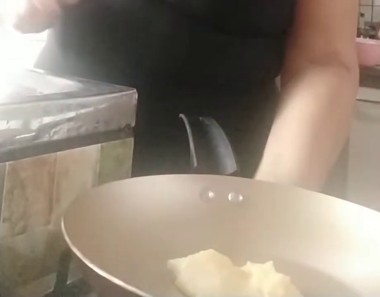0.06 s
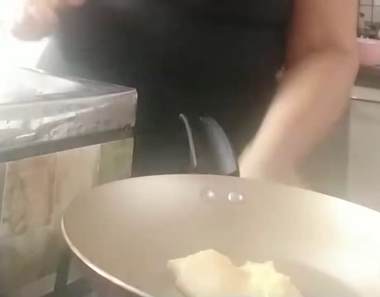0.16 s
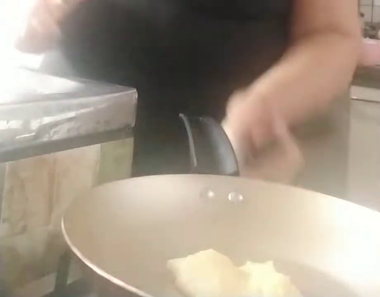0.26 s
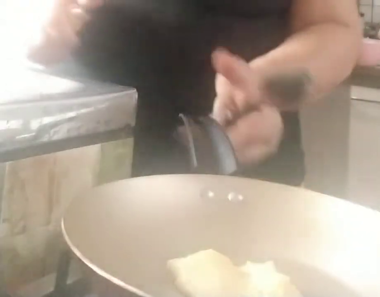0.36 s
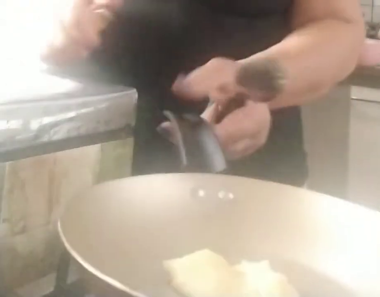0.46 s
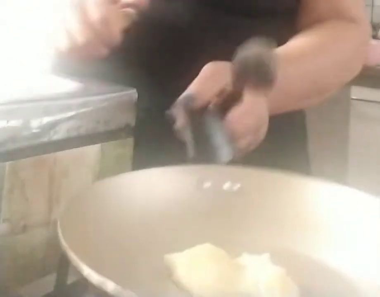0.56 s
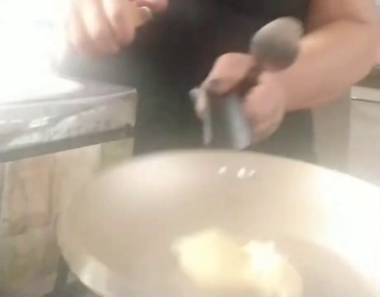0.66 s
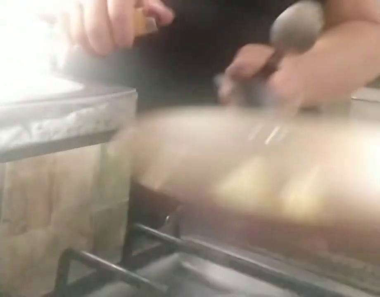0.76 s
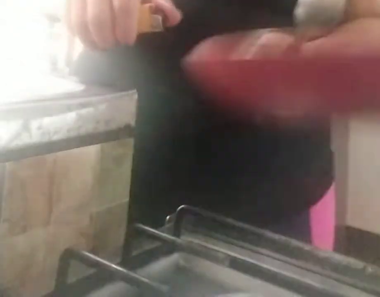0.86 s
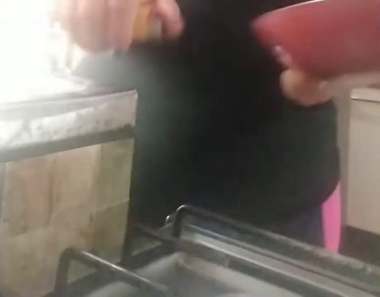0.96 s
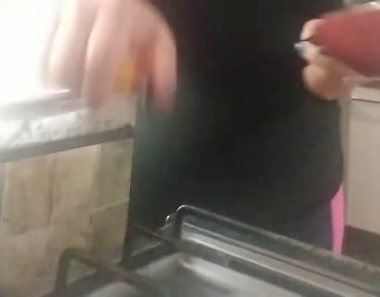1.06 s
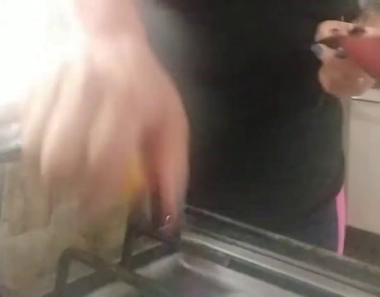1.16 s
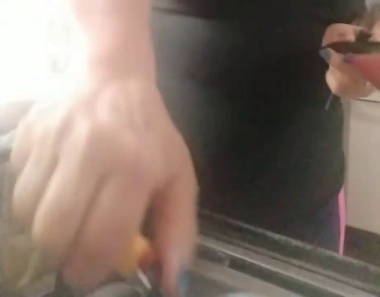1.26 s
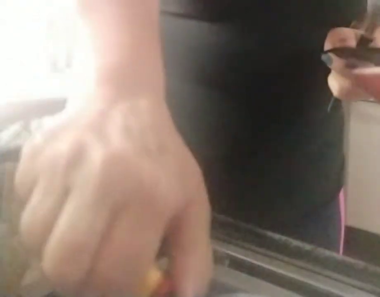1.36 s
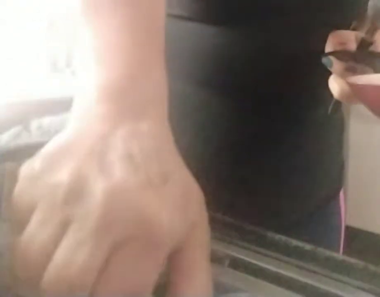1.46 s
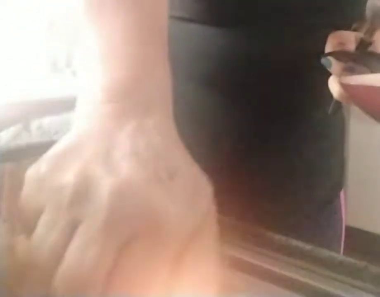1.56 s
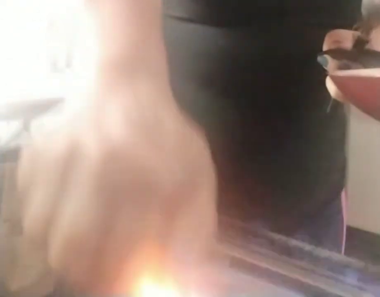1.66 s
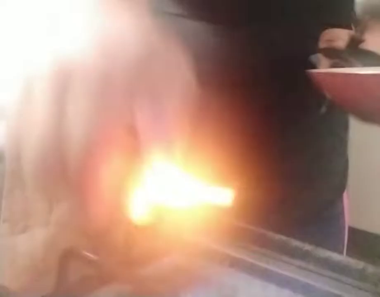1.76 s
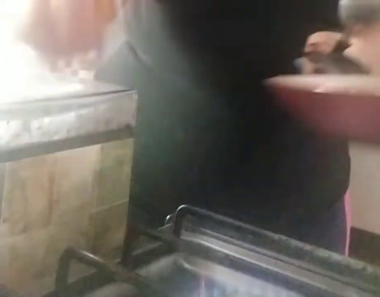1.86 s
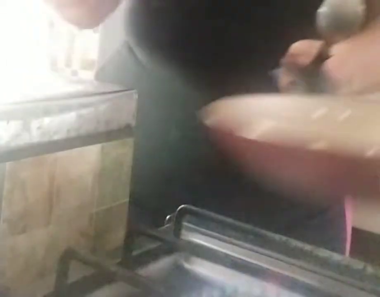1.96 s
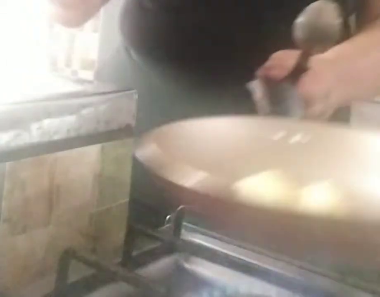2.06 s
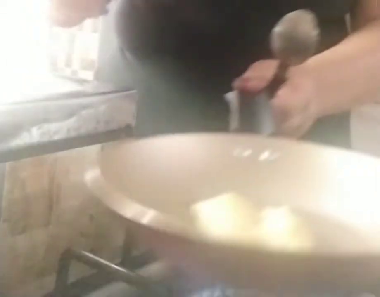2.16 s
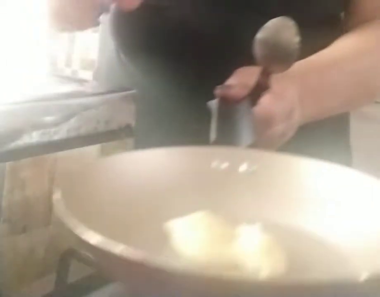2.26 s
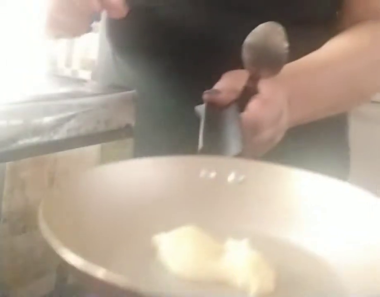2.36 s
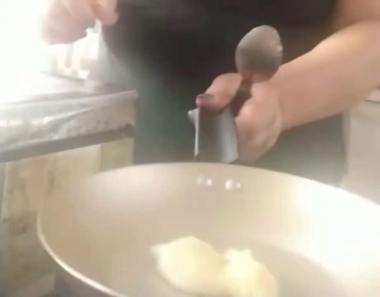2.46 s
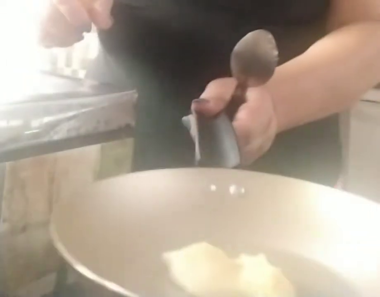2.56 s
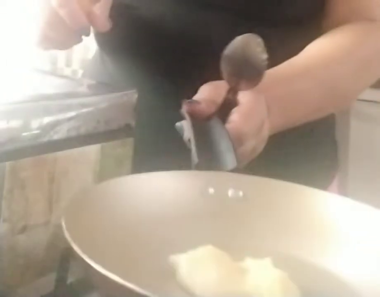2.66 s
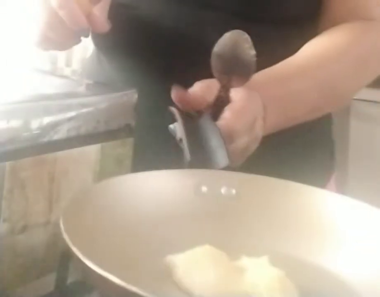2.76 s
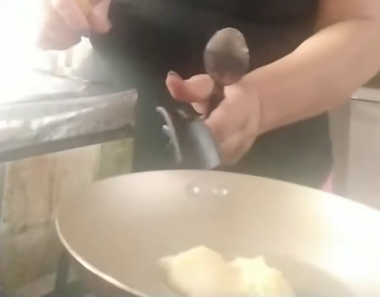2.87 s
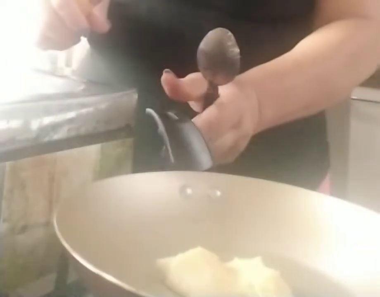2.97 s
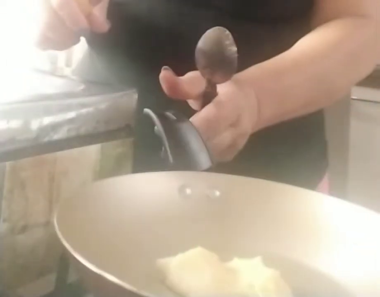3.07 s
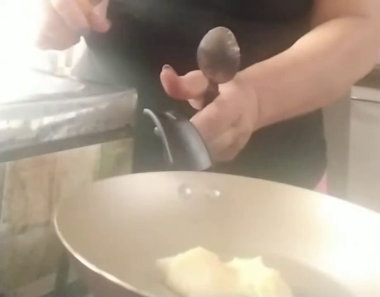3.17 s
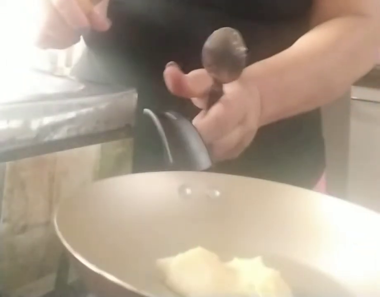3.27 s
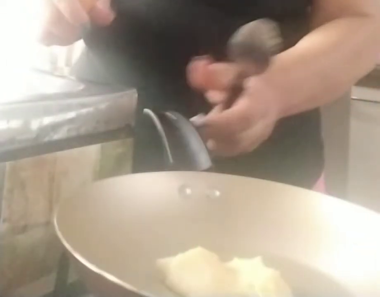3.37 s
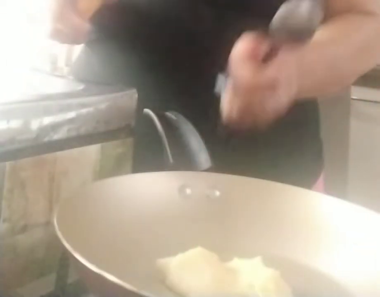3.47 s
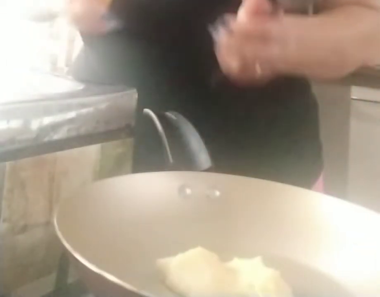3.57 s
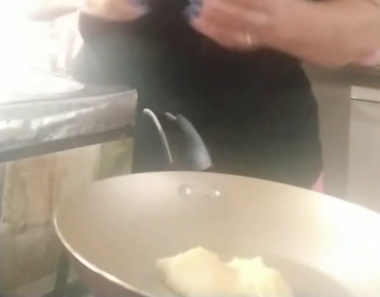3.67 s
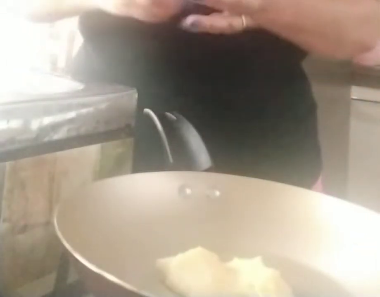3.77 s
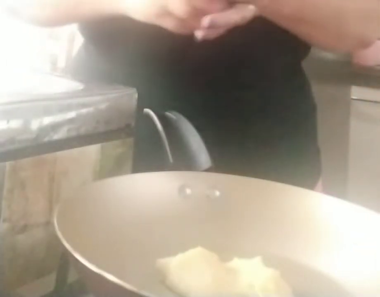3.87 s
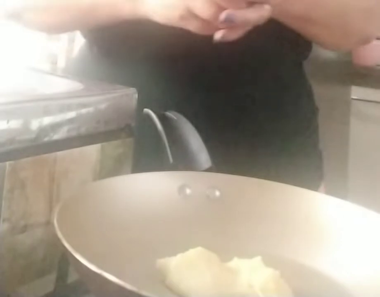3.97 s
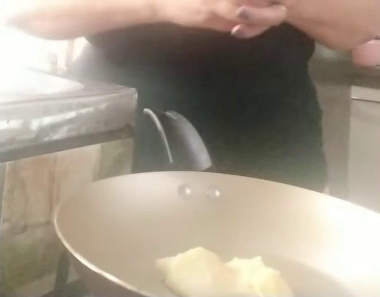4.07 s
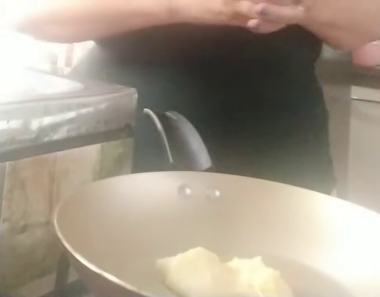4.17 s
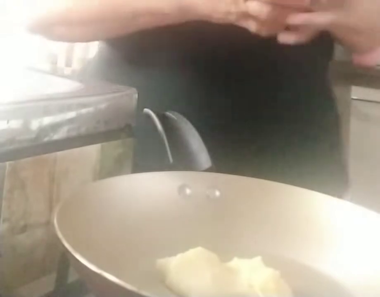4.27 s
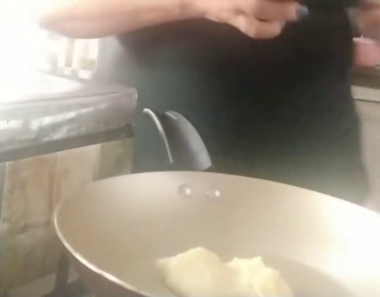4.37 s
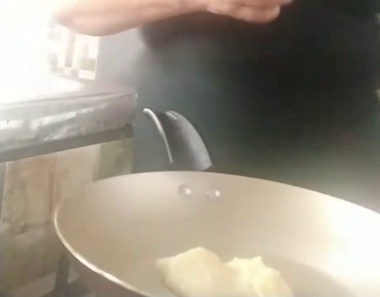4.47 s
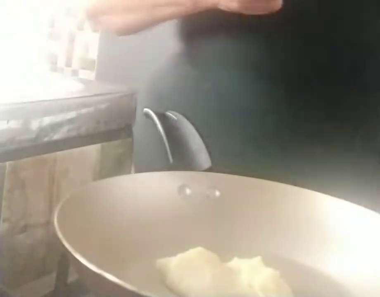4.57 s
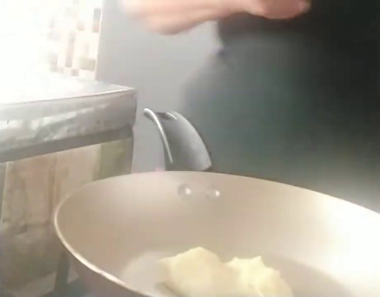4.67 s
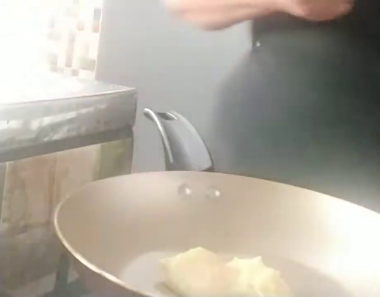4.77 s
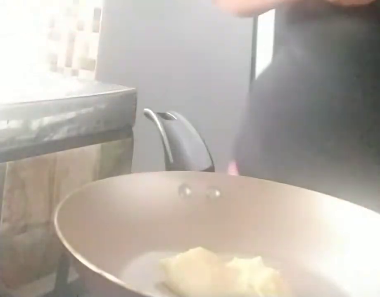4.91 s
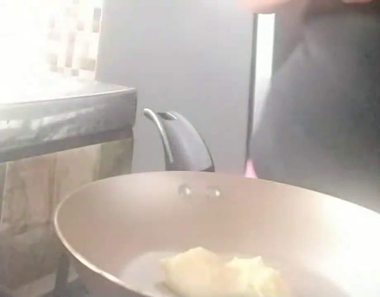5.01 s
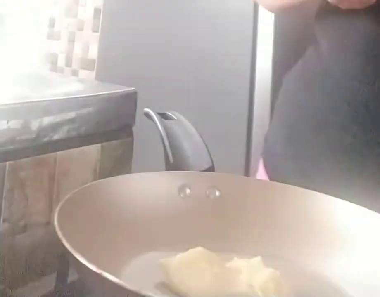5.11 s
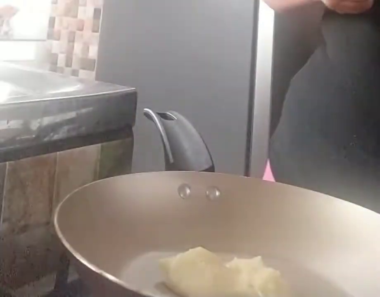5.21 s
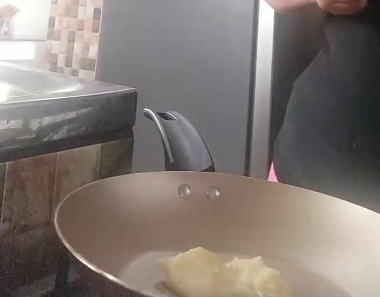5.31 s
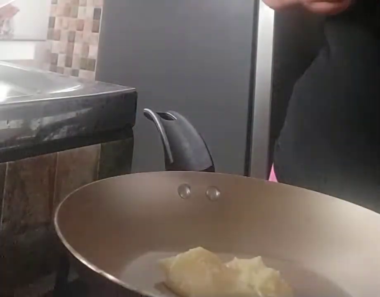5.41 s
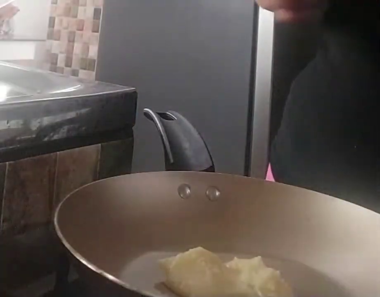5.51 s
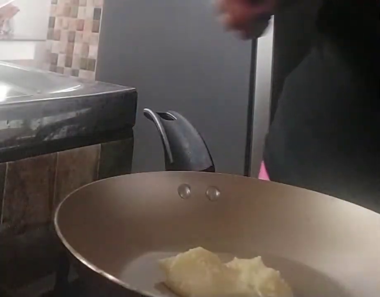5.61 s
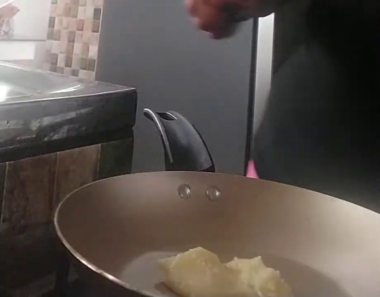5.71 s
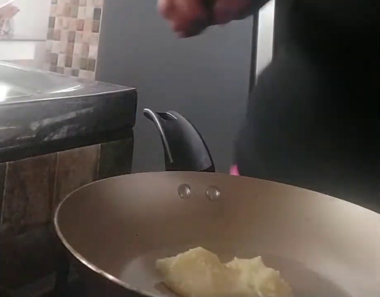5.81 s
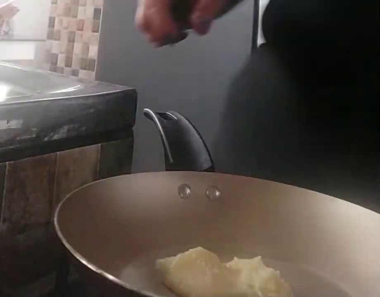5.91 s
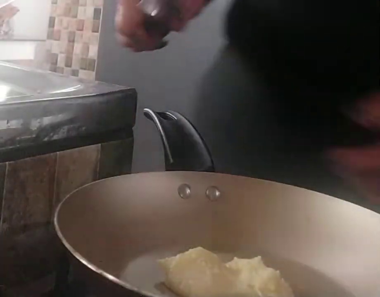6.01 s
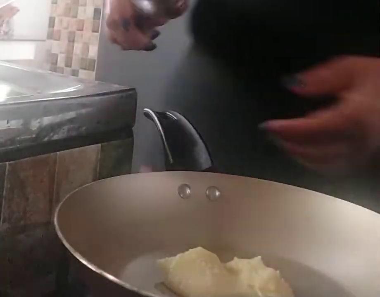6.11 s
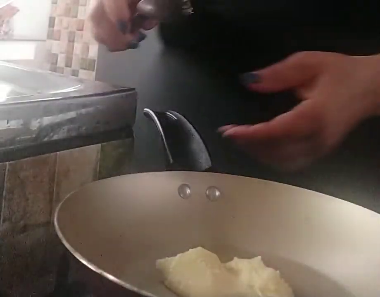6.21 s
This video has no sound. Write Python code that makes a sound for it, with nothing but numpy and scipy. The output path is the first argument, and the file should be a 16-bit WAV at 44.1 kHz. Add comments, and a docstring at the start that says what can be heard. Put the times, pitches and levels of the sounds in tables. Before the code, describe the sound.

Close stove noises in a tiled kitchen: metal clanks, a sharp lighter snap, whooshing gas, pan set down, bright clicks, a distant rooster.

```python
"""Clanks and scrapes of a frying pan lifted off a gas stove, set back and slid into place, by noise and ringing modes.
In between, the iron grate is knocked, a lighter snaps, and gas hisses and catches with a puff: noise and a rising sine.
Spoon and hard plastic things click in a small tiled kitchen of random echoes; soft soles brush the floor.
Fingers tap and hands rub the hollow microphone case; a rooster, two sines, crows far away over steady coloured hiss."""
import sys
import numpy as np
from scipy import signal
from scipy.fft import rfft, irfft
from scipy.io import wavfile
from scipy.ndimage import uniform_filter1d

SR = 44100
rng = np.random.default_rng(int(sys.argv[2]) if len(sys.argv) > 2 else 0)


def unload_audio(sound):
    """Save the sound as a 16-bit wav file, at the path given as the first command line argument."""
    columns = np.transpose(np.atleast_2d(sound))
    # keep every value between -1 and 1, then stretch to whole-number steps
    steps = np.round(np.clip(columns, -1, 1) * 32767)
    wavfile.write(sys.argv[1], SR, steps.astype(np.int16))


N = 275625
TIME = np.arange(N) / SR
FREQS = np.maximum(np.arange(N // 2 + 1) * SR / N, 1)

# Pan against grate. Each row: start in seconds, clank in dB, thud in dB, tick in dB, ping in Hz, ping in dB.
PAN_KNOCKS = [(0.139, -68, -47, -36, 1264, -40), (0.4364, -32, -51, -39.5, 3900, -41.5),
              (0.568, -49, -41, -48, 2830, -48), (0.623, -47, -39, -60, 946, -40),
              (2.4605, -28, -40, -20, 4340, -41), (2.476, -40, -35, -50, 1760, -47),
              (2.5141, -39.5, -43, -30, 2890, -32), (2.655, -24.5, -29, -25.5, 2430, -33),
              (2.667, -29, -29, -25.5, 1120, -36), (2.686, -28, -31, -50, 1880, -46),
              (2.693, -44, -31, -50, 308, -26), (2.6992, -38, -32, -59, 320, -30),
              (2.711, -48, -36, -59, 316, -23), (2.969, -38.5, -41.5, -64, 1370, -41),
              (2.992, -38, -38, -64, 1400, -42), (3.008, -42, -37, -62, 1010, -40)]
# Long rings of the pan. Each row: frequency in Hz, level re blow in dB, t60 in seconds.
PAN_MODES = [(1000, -2, 0.23), (1870, -22, 0.18), (2090, -9, 0.36), (2730, -25, 0.2), (4360, -18, 0.4),
             (5150, -6.5, 0.21), (8700, -28, .25)]
# Clusters of short pan modes. Each row: centre in Hz, width in Hz, gain in dB.
PAN_PEAKS = [(1050, 600, 5), (1920, 300, 6), (2830, 270, 7), (3560, 150, 7), (4050, 510, 18),
             (5450, 230, -7), (8690, 210, 16.5), (10000, 200, 3), (10760, 300, 9)]
# Stove thud spectrum. Each row: frequency in Hz, relative density in dB per Hz.
THUD_COLOUR = [(40, -17), (110, -10), (180, -6), (320, -3.5), (430, -10.5), (600, -6.5), (900, -42)]
# Clank spectrum of pan and grate. Each row: frequency in Hz, relative density in dB per Hz.
CLANK_COLOUR = [(350, -28), (600, 0), (1000, 3.5), (1500, 1), (2700, 2.5), (3500, -19.5), (4000, -18),
                (5000, -22), (8000, -35)]
# Contact tick spectrum. Each row: frequency in Hz, relative density in dB per Hz.
TICK_COLOUR = [(2500, -14.5), (3300, 1.5), (3800, -19), (5000, -3), (6500, -6.5), (7500, 5.5), (8300, -8.5),
               (9000, 6), (10500, -5), (12000, -16), (16000, -28)]
# Low modes of the pan, heard within the thud. Each row: centre in Hz, width in Hz, gain in dB.
PAN_LOW_PEAKS = [(199, 25, 16.5), (321, 32, 18), (428, 71, 21)]
# Stove, likeness of channels. Each row: frequency in Hz, correlation, limited to -1..1 in use.
STOVE_LIKENESS = [(60, 1.1), (300, 0.64), (600, 0.65), (1000, -0.06), (2000, 0), (9000, 0.5)]
# Stove, off to one side. Each row: frequency in Hz, left-right difference in dB.
STOVE_BALANCE = [(200, -1.5), (500, 1), (1000, 3), (2000, -1.5), (5000, 0), (9000, 0.5)]

# Pan pushed over the grate. Each row: start in seconds, end in seconds, level in dB, swell over the push in dB.
PAN_SLIDES = [(0.136, 0.141, -36, -2), (0.446, 0.505, -46, -2), (0.526, 0.587, -46.5, 3),
              (0.59, 0.65, -43.5, -3.5), (2.462, 2.57, -47, 2.5), (2.65, 2.705, -39, -0.5),
              (2.717, 2.943, -54.5, 3), (2.97, 3.012, -41.5, -6.5)]
# Scrape spectrum of the pushes. Each row: frequency in Hz, relative density in dB per Hz.
SLIDE_COLOUR = [(40, -4), (170, 10), (330, 0.5), (700, 1.5), (1050, -5.5), (1500, -6), (2700, -11),
                (4500, -23), (6500, -16), (8800, -9.5), (12000, -20), (16000, -52)]
# Pan resonances rung by the dragging rim. Each row: centre in Hz, width in Hz, gain in dB.
DRAG_PEAKS = [(994, 38, 5.5), (1780, 150, -7), (2110, 70, -4), (2800, 240, -5), (4100, 270, -11.5),
              (5640, 430, -18), (8830, 290, -6)]

# Grate knocked by the lighter. Each row: start in seconds, level in dB.
GRATE_HITS = [(1.2832, -23), (1.285, -23.5), (1.2985, -39)]
# Long rings of the grate. Each row: frequency in Hz, level re blow in dB, t60 in seconds.
GRATE_MODES = [(173, -11, 0.31), (428, -23, 0.5), (760, -14, 0.11), (1020, -31.5, 0.86), (1285, -19, 0.62),
               (1405, -18, 0.4), (1714, -19, 0.24), (1940, -17, 0.12), (2159, -19.5, 0.47),
               (2440, -26, 0.24), (2520, -15, 0.22), (5190, -23.5, 0.36), (5260, -29, 0.2)]
# Quickly damped grate modes. Each row: centre in Hz, width in Hz, gain in dB.
GRATE_PEAKS = [(1934, 87, 21), (3260, 250, 11), (5400, 180, 16.5), (10660, 500, 20.5)]

# Flame catches, then leaps round the burner. Each row: start in seconds, roar in dB, whoop in dB.
PUFFS = [(1.585, -34, -27), (1.637, -34, -38)]
# Gas hiss spectrum. Each row: frequency in Hz, relative density in dB per Hz.
GAS_COLOUR = [(500, -8), (900, -5), (2000, -11), (4500, -17), (5500, -1), (6500, -27), (8000, -5),
              (9300, 2), (12000, -16), (16000, -34)]
# Flame roar spectrum. Each row: frequency in Hz, relative density in dB per Hz.
FLARE_COLOUR = [(25, -11), (70, 1.5), (160, -3), (300, -1.5), (600, -8.5), (1100, -8), (2000, -16.5),
                (5000, -29), (9000, -14.5), (14000, -39)]

# Lighter snaps. Each row: start in seconds, level in dB.
SPARKS = [(1.53, -36.5), (1.5791, -10), (1.5803, -2)]
# Snap spectrum. Each row: frequency in Hz, relative density in dB per Hz.
SPARK_COLOUR = [(200, -19), (900, -21), (2000, -21.5), (3600, -12.5), (4900, -15), (6000, -13.5),
                (7400, -11), (9200, -8.5), (11000, -12.5), (13000, -16), (16000, -23)]
# Small metal hood of the lighter. Each row: centre in Hz, width in Hz, gain in dB.
SPARK_PEAKS = [(3030, 320, -2), (4260, 300, 8), (5500, 420, 18.5), (6520, 260, 6), (7260, 340, 12),
               (8350, 350, 7.5), (9300, 440, 11), (10590, 330, 15)]

# Hard things clicking in the kitchen. Each row: start in seconds, crack in dB, dull knock in dB.
CLICKS = [(1.887, -38, -44), (1.904, -34.5, -45), (2.1029, -38, -39.5), (2.119, -55, -47.5),
          (3.3379, -31, -38.5), (3.3513, -29.5, -42), (3.372, -33, -41), (3.4006, -42, -60),
          (4.7827, -28.5, -41.5), (5.2257, -15.5, -40), (5.233, -9.5, -25.5), (5.2405, -16.5, -27.5)]
# Bright crack spectrum. Each row: frequency in Hz, relative density in dB per Hz.
CLICK_BRIGHT = [(1500, -29), (2800, -14), (3500, -9), (4400, -13), (5400, -8.5), (7000, -4), (8200, -1.5),
                (9300, 4), (10800, -1), (12000, -7), (16000, -30)]
# Dull knock spectrum. Each row: frequency in Hz, relative density in dB per Hz.
CLICK_DULL = [(100, -9), (300, -2), (550, 1), (1100, 3), (1700, 6.5), (2700, 11), (4500, -10.5)]
# Resonances of the crack. Each row: centre in Hz, width in Hz, gain in dB.
CLICK_PEAKS = [(4030, 300, 6), (4820, 200, 6), (7700, 230, 9.5), (8440, 160, 11), (14000, 500, 6)]
# Rings of the small parts. Each row: frequency in Hz, level re crack in dB, t60 in seconds.
CLICK_MODES = [(3830, -16, 0.045), (7586, -32, 0.2), (7726, -32, 0.2), (8167, -27, 0.2), (8240, -26, 0.22)]

# Fingers on the case. Each row: start in seconds, level in dB.
TAPS = [(3.9694, -36.5), (5.809, -38.5), (6.1362, -42), (6.138, -31)]
# Case ringing like a short closed pipe. Each row: frequency in Hz, level re tap in dB, t60 in seconds.
CASE_MODES = [(230, -43, 0.042), (549, 6.5, 0.02), (1460, 1.5, 0.005), (2580, -7, 0.01), (3340, -19, 0.013),
              (9600, -6.5, 0.014)]
# Hands and cloth brushing past. Each row: start in seconds, end in seconds, level in dB.
RUBS = [(1.895, 1.963, -48), (2.056, 2.185, -51.5), (4.797, 4.82, -40.5), (4.998, 5.008, -52),
        (6.129, 6.132, -43.5)]
# Rub spectrum. Each row: frequency in Hz, relative density in dB per Hz.
RUB_COLOUR = [(200, -3), (540, 10.5), (1000, -3), (1550, -8), (2600, -1.5), (3800, -9.5), (6500, -5.5),
              (9200, 10), (11000, -4.5), (16000, -18)]

# Feet shuffling on tiles. Each row: start in seconds, level in dB.
SHUFFLES = [(4.035, -45), (4.67, -44.5)]
# Shuffle spectrum. Each row: frequency in Hz, relative density in dB per Hz.
SHUFFLE_COLOUR = [(150, -10), (600, 0), (1200, -4), (2500, -11.5), (12000, -23)]

# Steady background spectrum. Each row: frequency in Hz, relative density in dB per Hz.
AIR_COLOUR = [(20, -1.5), (65, -6), (90, -12.5), (200, -6.5), (290, -12), (700, -12.5), (1080, -23.5),
              (2000, -22.5), (3800, -22), (6000, -23), (8000, -23), (10000, -21.5), (12000, -30),
              (15500, -38.5)]
# Broad peaks and one narrow gap in the background hiss. Each row: centre in Hz, width in Hz, gain in dB.
AIR_PEAKS_AND_GAP = [(542, 166, 14), (1514, 263, 14.5), (2543, 320, 7), (3470, 910, 5.5),
                     (3695, 183, -37.5), (8800, 590, 7), (9420, 610, 7.5)]
# Background balance. Each row: frequency in Hz, left-right difference in dB.
AIR_BALANCE = [(60, 0), (110, -3.5), (200, 0), (380, -1.5), (700, 1), (1290, -1), (2380, -2), (4400, -0.5),
               (8120, -9), (15000, 3)]
# Default likeness of channels. Each row: frequency in Hz, left-right correlation.
LIKENESS = [(30, 0), (70, 0.74), (250, 0.65), (550, 0.96), (1100, 0.24), (2500, 0.54), (5000, 0.15),
            (9000, 0.061), (16000, 0)]
# Kitchen decay. Each row: frequency in Hz, t60 in seconds.
KITCHEN_T60 = [(100, 0.68), (500, 0.2), (1400, 0.48), (3700, 0.51), (9000, 0.48), (15000, 0.24)]

PING_T60_S = 0.048
SLIDE_ATTACK_S, SLIDE_T60_S = 0.0015, 0.3
PUSH_SLIPS_PER_S, SLIP_DECAY_S, PUSH_SMOOTH = 170, 0.0059, 0.44
DRAG_START_S, DRAG_END_S, DRAG_DB, DRAG_SWELL_DB = 2.468, 2.626, -44, -0.5
DRAG_SLIPS_PER_S, SLIP_SPREAD_DB = 700, 2
GAS_ON_S, IGNITION_S, GAS_DB, GAS_SWELL_DB = 1.526, 1.585, -49.5, 11
PUFF_ATTACK_S, PUFF_HOLD_S, ROAR_T60_S, WHOOP_T60_S = 0.0063, 0.021, 0.32, 0.12
FLUTTER_HZ, FLUTTER_RISE_HZ_PER_S, FLUTTER_TOP_HZ = 55.7, 1750, 330
RUB_ATTACK_S, RUB_T60_S = 0.0021, 0.34
CROW_START_S, CROW_END_S, CROW_START_HZ, CROW_SAG_HZ_PER_S = 3.37, 3.87, 1086, 48
CROW_DB, CROW_FADE_DB = -65.5, 3
AIR_DB = -50.5
CUTOFF_HZ = 15900


def pan_knocks():
    """Contact ticks and pings, the pan clanks and rings, and the stove top answers with a slower thud."""
    start_s, clank_db, thud_db, tick_db, ping_hz, ping_db = np.transpose(PAN_KNOCKS)
    tick = noise(TICK_COLOUR, PAN_PEAKS, ripple_peak_db=5) * panned(-0.94)
    tick = tick * bursts(start_s, tick_db, t60_s=0.043, rise_s=0.00046)
    clank = noise(CLANK_COLOUR, PAN_PEAKS, ripple_peak_db=10, likeness=STOVE_LIKENESS)
    clank = clank * bursts(start_s, clank_db, t60_s=0.065, rise_s=0.001)
    thud = noise(THUD_COLOUR, PAN_LOW_PEAKS, likeness=STOVE_LIKENESS)
    thud = thud * bursts(start_s, thud_db, t60_s=0.089, rise_s=0.0029)
    ping = np.zeros(N)
    for at_s, hz, db in zip(start_s, ping_hz, ping_db):
        envelope = bursts([at_s], [db], t60_s=PING_T60_S, rise_s=0.0012)
        ping += envelope * np.sin(2 * np.pi * hz * (TIME - at_s))
    long_ring = from_db(-16.5) * ring(start_s, clank_db, PAN_MODES, low_cut_hz=730)
    return tick + clank + thud + ping + long_ring


def pan_slide():
    """The base catches and slips on the iron bars: random jolts with short decays modulate coloured noise."""
    jolts = slips(PUSH_SLIPS_PER_S) + 1e-18
    grip = rms_one(signal.lfilter([1], [1, -np.exp(-1 / (SLIP_DECAY_S * SR))], jolts))
    resonances = [(322, 77, 3.4), (910, 230, 7.9), (2740, 200, 6.5), (8800, 180, 3)]  # Hz, width Hz, dB
    body = noise(SLIDE_COLOUR, resonances, ripple_peak_db=10, likeness=STOVE_LIKENESS)
    push_power = sum(stroke(start_s, end_s, db, SLIDE_ATTACK_S, SLIDE_T60_S, swell_db) ** 2
                     for start_s, end_s, db, swell_db in PAN_SLIDES)
    return np.sqrt(push_power) * rms_one(PUSH_SMOOTH + grip) * body


def rim_drag():
    """The rim drags on iron: every slip rings the pan's resonances, each with a strength of its own."""
    jolts, out = slips(DRAG_SLIPS_PER_S), 0
    for hz, width_hz, db in DRAG_PEAKS:
        radius = np.exp(-np.pi * width_hz / SR)
        drive = jolts * rng.standard_normal((2, N)) + 1e-18
        poles = [1, -2 * radius * np.cos(2 * np.pi * hz / SR), radius * radius]
        out = out + from_db(db) * signal.lfilter([1 - radius, 0, radius - 1], poles, drive)
    envelope = stroke(DRAG_START_S, DRAG_END_S, DRAG_DB, SLIDE_ATTACK_S, t60_s=0.29, swell_db=DRAG_SWELL_DB)
    return rms_one(out) * envelope


def grate():
    """The loose iron grate jumps and clatters briefly; its hardest landing sets it ringing."""
    start_s, db = np.transpose(GRATE_HITS)
    hardest = [np.argmax(db)]
    clatter = noise(CLANK_COLOUR, GRATE_PEAKS, likeness=STOVE_LIKENESS)
    clatter = clatter * bursts(start_s, db - 2, t60_s=0.12, rise_s=0.00098)
    tick = noise(TICK_COLOUR, GRATE_PEAKS) * bursts(start_s, db - 15, t60_s=0.09, rise_s=0.00044)
    thud = noise(THUD_COLOUR, [(184, 40, 10.7)]) * bursts(start_s, db - 9, t60_s=0.3, rise_s=0.025)
    long_ring = ring(start_s[hardest], db[hardest], GRATE_MODES, low_cut_hz=146)
    return (long_ring + clatter + tick) * panned(2) + thud


def grate_shift():
    """After its knock the grate shifts a little under the hand: held low noise."""
    return stroke(1.41, 1.515, db=-51, attack_s=0.013, t60_s=0.27) * noise(THUD_COLOUR)


def flare():
    """Gas hisses ever stronger, then lights in two puffs: a roar, and a whoop rising as the flame front spreads."""
    hiss = stroke(GAS_ON_S, IGNITION_S, GAS_DB, attack_s=0.0041, t60_s=0.087, swell_db=GAS_SWELL_DB)
    hiss = hiss * noise(GAS_COLOUR)
    flutter_hz = FLUTTER_HZ + FLUTTER_RISE_HZ_PER_S * (TIME - IGNITION_S)
    flutter_hz = np.clip(flutter_hz, FLUTTER_HZ, FLUTTER_TOP_HZ)
    roar, whoop = np.zeros(N), np.zeros(N)
    for start_s, roar_db, whoop_db in PUFFS:
        end_s = start_s + PUFF_HOLD_S
        roar += stroke(start_s, end_s, roar_db, PUFF_ATTACK_S, ROAR_T60_S, swell_db=-7)
        whoop += stroke(start_s, end_s, whoop_db, attack_s=0.054, t60_s=WHOOP_T60_S, swell_db=3)
    whoop = whoop * np.sin(2 * np.pi * np.cumsum(flutter_hz) / SR)
    return hiss + whoop + roar * noise(FLARE_COLOUR, likeness=STOVE_LIKENESS)


def lighter():
    """A thumb cocks the lighter, then it snaps close by: bursts through brief hood resonances, over a faint fizz."""
    start_s, db = np.transpose(SPARKS)
    snap = noise(SPARK_COLOUR, SPARK_PEAKS) * bursts(start_s, db, t60_s=0.019, rise_s=0.0018)
    fizz = noise(SPARK_COLOUR) * bursts(start_s, db - 25, t60_s=0.16, rise_s=0.0027)
    return (snap + fizz) * panned(0.62)


def clicks():
    """Small hard parts meet: a bright crack, a duller knock and a thin ring."""
    start_s, crack_db, knock_db = np.transpose(CLICKS)
    crack = noise(CLICK_BRIGHT, CLICK_PEAKS) * bursts(start_s, crack_db, t60_s=0.032, rise_s=0.00068)
    knock = noise(CLICK_DULL) * bursts(start_s, knock_db, t60_s=0.024, rise_s=0.00041)
    thin_ring = ring(start_s, crack_db, CLICK_MODES, low_cut_hz=1050)
    return (crack + thin_ring) * panned(-3) + knock * panned(-1.3)


def case_noises():
    """Finger taps ring the hollow case; hands and cloth rub softly as coloured noise."""
    start_s, db = np.transpose(TAPS)
    pressure = sum(stroke(rub_s, end_s, rub_db, RUB_ATTACK_S, RUB_T60_S) for rub_s, end_s, rub_db in RUBS)
    rub = pressure * noise(RUB_COLOUR, ripple_peak_db=10) * panned(-4.5)
    return ring(start_s, db, CASE_MODES, low_cut_hz=180) + rub


def shuffles():
    """Soft soles brush the floor: slow-rising noise bursts."""
    start_s, db = np.transpose(SHUFFLES)
    return noise(SHUFFLE_COLOUR) * bursts(start_s, db, t60_s=0.3, rise_s=0.019)


def rooster():
    """One long, slightly sagging, fading note; at this distance mostly its second harmonic is left."""
    pitch_hz = CROW_START_HZ - CROW_SAG_HZ_PER_S * (TIME - CROW_START_S)
    call = stroke(CROW_START_S, CROW_END_S, CROW_DB, attack_s=0.033, t60_s=0.34, swell_db=-CROW_FADE_DB)
    waver = rms_one(uniform_filter1d(rng.standard_normal(N), SR // 100))
    phase = 2 * np.pi * np.cumsum(pitch_hz * (1 + 0.007 * waver)) / SR
    return call * (np.sin(2 * phase) + from_db(-29) * np.sin(phase))


def background():
    """Steady hiss of the room: noise with broad peaks and one narrow gap."""
    return from_db(AIR_DB) * noise(AIR_COLOUR, AIR_PEAKS_AND_GAP, at_hz(AIR_BALANCE, FREQS), ripple_peak_db=5)


def kitchen(x):
    """Tiled walls return separate echoes that thicken into a tail, each band decaying at its own pace."""
    age_s, tail = TIME[:SR // 2], 0
    density = np.clip((500 + 9000 * age_s) / SR, 1e-4, 1)  # echoes per sample
    echoes = (rng.random((2, len(age_s))) < density) / np.sqrt(density)
    edges_hz = np.geomspace(130, 18000, 9)
    for low_hz, high_hz in zip(edges_hz, edges_hz[1:]):
        band_pass = signal.butter(2, [low_hz, high_hz], "band", fs=SR, output="sos")
        band = signal.sosfilt(band_pass, echoes * rng.standard_normal((2, len(age_s))))
        t60_s = at_hz(KITCHEN_T60, np.sqrt(low_hz * high_hz))
        tail = tail + band * from_db(-60 * age_s / t60_s)
    tail = tail * np.clip(age_s / 0.0068 - .6, 0, 1)  # silent for the first 4 ms
    return signal.fftconvolve(x, rms_one(tail) / np.sqrt(len(age_s)), axes=1)[:, :N]


def noise(spectrum, peaks=(), left_db=0, ripple_peak_db=0, likeness=LIKENESS):
    """Stereo noise of a given colour, its channels alike to a degree set by frequency; rms 1 before any gain."""
    level_db = at_hz(spectrum, FREQS)
    for hz, width_hz, db in peaks:
        level_db = level_db + db / (1 + (2 * (FREQS - hz) / width_hz) ** 2)
    # fine ripple, full above 2 kHz
    knots_hz = np.arange(0, SR / 2, 70)
    ripple = rng.uniform(-1, 1, len(knots_hz)) * np.minimum(knots_hz / 2000, 1)
    level_db = level_db + ripple_peak_db * np.interp(FREQS, knots_hz, ripple)
    alike = np.clip(at_hz(likeness, FREQS), -1, 1)
    mid, side = rfft(rng.standard_normal((2, N)))
    pair = np.sqrt(1 + alike) * mid + np.sqrt(1 - alike) * side * [[1], [-1]]
    return rms_one(irfft(pair * from_db(level_db) * panned(left_db), N))


def ring(start_s, levels_db, modes, low_cut_hz):
    """Every blow rings every mode with its own strength; each mode reaches the two ports with its own phase."""
    out = np.zeros((2, N))
    at = (np.array(start_s) * SR).astype(int)
    for hz, db, t60_s in modes:
        decay, step = from_db(-60 / (t60_s * SR)), 2 * np.pi * hz / SR
        blows = np.full(N, 1e-18)
        blows[at] = from_db(np.array(levels_db) + db + rng.standard_normal(len(at)))
        swing = signal.lfilter([1], [1, -decay * np.exp(1j * step)], blows)
        apart_rad = np.arccos(np.clip(at_hz(LIKENESS, hz), -1, 1)) * rng.choice([-.5, .5])
        out += np.imag(swing * np.exp(1j * apart_rad * np.array([[1], [-1]])))
    # small bodies radiate little bass
    return signal.sosfilt(signal.butter(4, low_cut_hz, "high", fs=SR, output="sos"), out)


def bursts(start_s, levels_db, t60_s, rise_s):
    """Envelope of blows that swell quickly and die away; their powers add."""
    power = np.zeros(N)
    for at_s, db in zip(start_s, levels_db):
        start = int(at_s * SR)
        age_s = TIME[:min(SR, N - start)]
        blow = from_db(db - 60 * age_s / t60_s) * (1 - np.exp(-age_s / rise_s))
        power[start:start + len(age_s)] += blow ** 2
    return np.sqrt(power)


def stroke(start_s, end_s, db, attack_s, t60_s, swell_db=0):
    """Envelope of a held action: it sets in, holds, swells or sinks until its end, then dies away."""
    age_s = np.maximum(TIME - start_s, 0)
    held = np.minimum(age_s / max(end_s - start_s, .001), 1)
    released_db = np.minimum(60 * np.maximum(TIME - end_s, 0) / t60_s, 200)
    return (1 - np.exp(-age_s / attack_s)) * from_db(db + swell_db * held - released_db)


def slips(per_s):
    """Tiny stick-slip jolts at random moments, of uneven size."""
    size_db = SLIP_SPREAD_DB * np.clip(rng.standard_normal(N), -2, 2)
    return (rng.random(N) < per_s / SR) * from_db(size_db)


def ports(x, balance):
    """Each pitch reaches the two microphone ports with its own left-right difference."""
    return irfft(rfft(x) * panned(at_hz(balance, FREQS)), N)


def panned(left_db):
    """Gains of the two channels for a left-right difference."""
    return from_db(np.array([[.5], [-.5]]) * left_db)


def at_hz(points, hz):
    """Read a spectrum on a log-frequency axis."""
    points = np.array(points)
    return np.interp(np.log(hz), np.log(points[:, 0]), points[:, 1])


def from_db(db):
    """Decibels to gain."""
    return np.exp(np.asarray(db) * (np.log(10) / 20))


def rms_one(x):
    """Scale to unit rms."""
    return x / np.sqrt(np.mean(x ** 2) + 1e-20)


def scene():
    """Things at the stove are close and dry; the clicks come from farther off, with more room."""
    stove = ports(pan_knocks() + pan_slide() + rim_drag() + grate() + flare(), STOVE_BALANCE)
    snap, clack = lighter(), clicks()
    room = kitchen(from_db(-12.5) * stove + from_db(-16.5) * snap + from_db(-4.5) * clack)
    handling = case_noises() + grate_shift()
    return stove + snap + clack + room + handling + shuffles() + rooster() + background()


def record(dry):
    """A steep elliptic low-pass cuts the top."""
    return signal.sosfilt(signal.ellip(10, .2, 80, CUTOFF_HZ, fs=SR, output="sos"), dry)


dry = scene()
out = record(dry)
unload_audio(out)
```